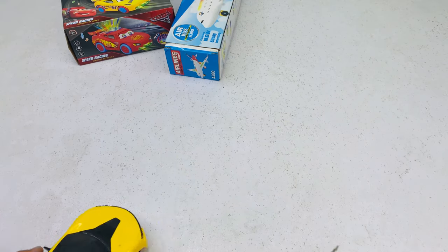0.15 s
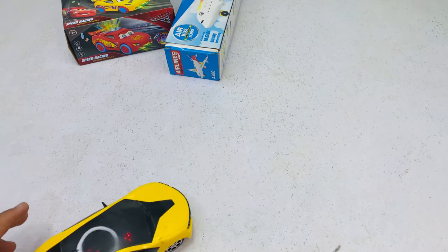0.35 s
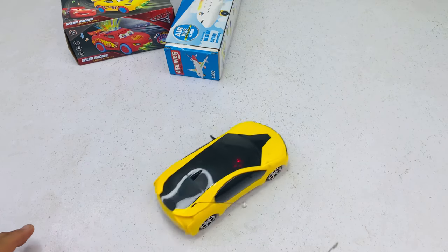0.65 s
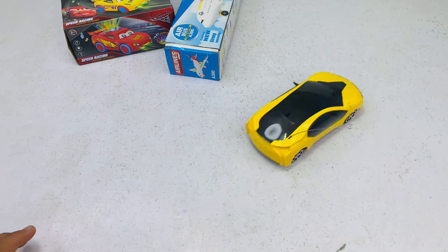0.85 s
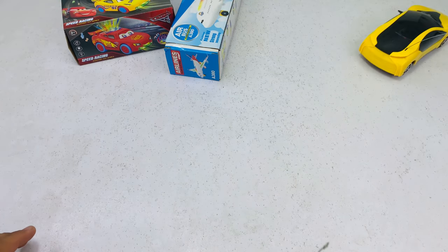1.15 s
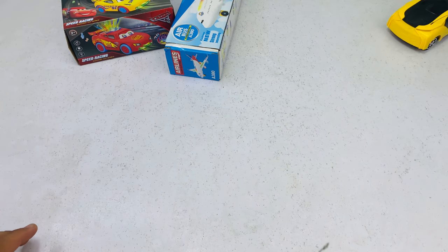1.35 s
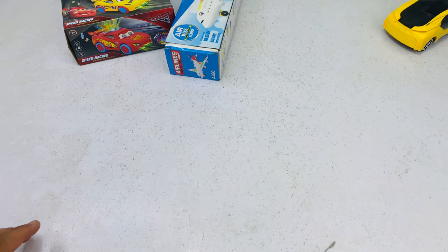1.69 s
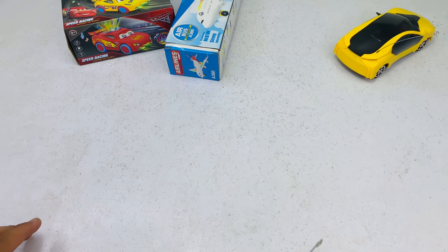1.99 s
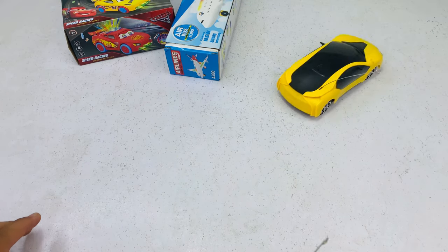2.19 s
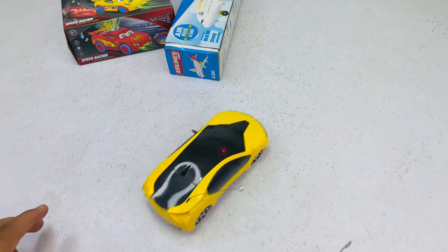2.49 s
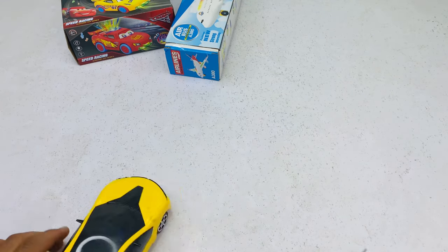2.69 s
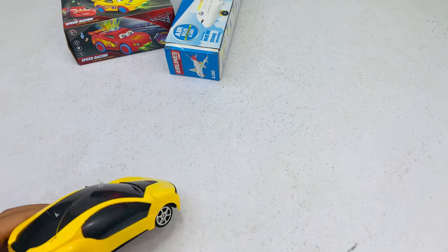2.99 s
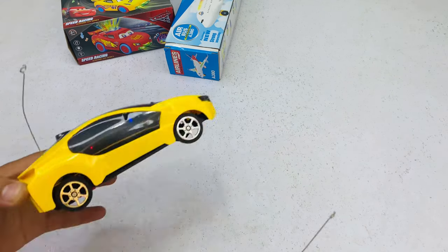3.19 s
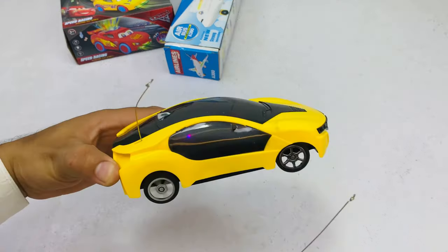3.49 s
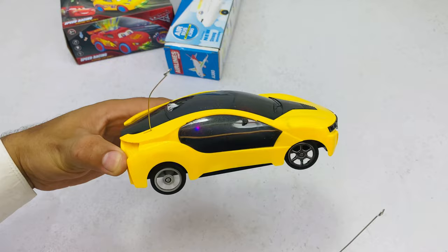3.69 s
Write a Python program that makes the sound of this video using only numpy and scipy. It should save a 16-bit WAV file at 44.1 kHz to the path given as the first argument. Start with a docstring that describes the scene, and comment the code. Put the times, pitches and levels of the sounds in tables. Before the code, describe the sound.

Plastic gear whir of a toy car drives off, stops, reverses back, then spins on when lifted.

```python
"""Toy car on a hard floor

A toy remote-control car drives off indoors, stops, reverses and is picked up with its wheels spinning.
Plastic gear teeth rattle its hollow shell, in a burst on every turn of an off-centre gear.
The small motor hums beneath, its brushes hiss, and it strains into reverse with a few ringing tones.
The rolling wheels rumble and make the floor boom; the chassis knocks now and then in a small room."""
import sys
import numpy as np
from scipy import signal
from scipy.fft import rfft, irfft, next_fast_len
from scipy.io import wavfile
from scipy.ndimage import map_coordinates

SR = 44100
rng = np.random.default_rng(int(sys.argv[2]) if len(sys.argv) > 2 else 0)


def generate_wav(sig):
    """Save sig (samples, or channels by samples) to the path in sys.argv[1] as 16-bit PCM at SR."""
    pcm = np.round(np.clip(np.atleast_2d(sig).T, -1, 1) * 32767).astype(np.int16)
    wavfile.write(sys.argv[1], SR, pcm)


N = 169785

# Source levels hold ahead of distance, room, stereo and microphone. Colours are relative, at rms 1.

# Drive gear speed. Each row: time in seconds, turns per second.
GEAR_SPEED = [(0, 43), (.3, 43.3), (1.1, 54), (1.35, 37.7), (1.55, 10.75), (1.85, 40.1), (2.5, 43.5),
              (2.9, 44), (3.17, 23.3), (3.3, 44)]
# Gear noise. Each row: time in seconds, shell clatter in dB, treble rasp in dB before RASP_TRIM_DB.
GEAR_LEVELS = [(0.0, -27, -45.5), (0.07, -44, -50.5), (0.11, -49, -64), (0.17, -42, -59.5),
               (0.26, -34, -46.5), (0.32, -42, -55), (0.87, -30.5, -41.5), (1.17, -32, -42),
               (1.41, -48, -58.5), (1.54, -72, -83), (1.75, -48, -56), (1.86, -50.5, -55.5),
               (1.91, -39, -47.5), (2.05, -44.5, -52.5), (2.07, -32, -40), (2.12, -35, -45.5),
               (2.55, -29.5, -41), (2.63, -34.5, -39.5), (2.65, -23.5, -32.5), (2.72, -36, -49),
               (2.81, -36, -47), (2.85, -27.5, -37), (3.06, -43, -51.5), (3.1, -48, -58.5),
               (3.17, -50, -67), (3.33, -39, -42.5), (3.54, -33, -36.5), (3.8, -33.5, -34)]
RASP_TRIM_DB = 3
TEETH_PER_TURN, MOTOR_TURNS_PER_TURN = 29, 3.87  # per turn of the drive gear
LIFT_MIDDLE_S, LIFT_TAKES_S = 3.06, 0.17  # the car leaves the floor
# Gear colours on the floor and in the hand. Each row: frequency in Hz, density in dB per Hz.
CLATTER_FLOOR = [(200, -53), (350, -8), (590, -3.5), (760, 0.5), (950, 0), (1250, -7.5), (1600, -12.5),
                 (2000, -24), (2800, -26.5), (5000, -100)]
CLATTER_HAND = [(200, -29), (480, -12.5), (900, -3.5), (1060, 2), (1350, 0), (1620, 1), (1850, -11),
                (2800, -16), (5000, -81)]
RASP_FLOOR = [(1000, -43.5), (1800, 4.5), (2300, 2.5), (3000, -1.5), (3700, 2.5), (4600, 1), (5500, -5.5),
              (7500, -5), (11000, -15), (15000, -23)]
RASP_HAND = [(900, -7), (1800, -3), (2600, 7), (3000, 4.5), (3500, 5.5), (4800, 5), (5600, 4), (7200, 5),
             (8200, 1), (10600, 0.5), (12300, -6), (15000, -19)]
CLATTER_BITE_DB, CLATTER_SHAKE_DB = 0.23, 2.36  # swing once a turn, random swing
RASP_BITE_DB, RASP_SHAKE_DB = 1.2, 1.7
BUZZ_DB, BUZZ_ORDERS = -12.5, 40  # against the teeth; harmonics of the motor turn
# Off-centre gear's knock. Each row: time in seconds, level in dB against the teeth.
SLAP_LEVEL = [(0, -5), (3.15, -11.5), (3.28, 2.5), (3.55, 0.5), (3.65, -9)]
SLAP_FLOOR_HZ, SLAP_HAND_HZ, SLAP_T60_S, SLAP_SCATTER_DB = 875, 1280, .012, 1.5
# Air inside the shell. Each row: frequency in Hz, width in Hz, peak gain in dB.
CAVITY_MODES = [(486, 56, -3), (622, 10, -4)]
# Drone of that air. Each row: time in seconds, level in dB.
DRONE_LEVEL = [(0, -32), (.12, -46), (.25, -45), (.4, -50.5), (1.17, -38.5), (1.5, -77), (1.9, -52.5),
               (2.65, -37.5), (3.2, -57.5), (3.27, -44), (3.78, -41.5)]
# Motor hum. Each row: multiple of the motor speed, mean amplitude in dB against the clatter.
MOTOR_HARMONICS = [(1, -17.5), (3, -20)]

# Brush hiss. Each row: time in seconds, level in dB.
BRUSH_LEVEL = [(0, -48), (.15, -85), (.45, -54), (.65, -48.5), (1.2, -53), (1.5, -88), (1.9, -52),
               (2.1, -55), (3.15, -58.5), (3.85, -36)]
# Brush hiss colour. Each row: frequency in Hz, density in dB per Hz.
BRUSH_COLOUR = [(2500, -24), (3200, -27), (3520, 14.5), (3800, 1), (4100, 7), (4600, 7.5), (5200, -16),
                (7000, -14)]
# Strain into reverse. Each row: time in seconds, level in dB.
RESTART_LEVEL = [(1.55, -81), (1.72, -49.5), (1.95, -50.5), (2.2, -60)]
# Resonances of that strain. Each row: frequency in Hz, width in Hz, peak gain in dB.
STRAIN_MODES = [(895, 15, 7.5), (1005.2, 71, 0.5), (1623, 65, -1)]
HISS_HZ, HISS_HALF_WIDTH_HZ, HISS_DB = 4210, 620, -6  # dB against the strain's resonances

# Chassis knocks. Each row: start in seconds, then click, thud and ring in dB before their trims.
KNOCKS = [(.533, -34, -40, -42), (0.9443, -24, -31, -31.5), (2.186, -48, -39, -36),
          (2.308, -34, -32, -28.5), (2.6467, -23.5, -29, -24), (2.655, -37, -32, -39),
          (2.68, -43, -18, -32), (2.913, -30, -41, -27), (2.963, -27, -37, -53),
          (3.1115, -26.5, -30.5, -30.5), (3.26, -28, -30.5, -57), (3.383, -18, -42, -48),
          (3.4492, -22, -34, -45)]
CLICK_T60_S, THUD_T60_S, RING_T60_S = 0.028, 0.022, 0.14
CLICK_TRIM_DB, THUD_TRIM_DB, RING_TRIM_DB = -8.5, -1.5, -4.5
# Ring of the shell. Each row: frequency in Hz, density in dB per Hz.
RING_COLOUR = [(400, -9), (1300, 3), (1600, 2), (2400, 4), (3300, 1), (4200, -3), (8000, -13), (15000, -59)]

# Wheel rumble. Each row: time in seconds, level in dB before ROLL_TRIM_DB.
ROLL_LEVEL = [(0.0, -31), (0.06, -52.5), (0.37, -48), (0.73, -36), (0.9, -36), (1.15, -30), (1.46, -40),
              (1.54, -57), (1.68, -40.5), (1.96, -30.5), (2.0, -31.5), (2.51, -33.5), (2.73, -34.5),
              (2.85, -50), (3.19, -45), (3.39, -62.5), (3.71, -44)]
ROLL_TRIM_DB, ROLL_SIDE_DB = -3, -11.5
# Low chassis resonances. Each row: frequency in Hz, width in Hz, peak gain in dB.
CHASSIS_MODES = [(154.7, 7.1, -1.5), (200.8, 16.3, 0.5), (239.8, 8, 1.5), (271.7, 8.2, -1.5), (310, 7.5, 2),
                 (385.4, 38.5, -9)]
# Floor boom. Each row: time in seconds, level in dB.
BOOM_LEVEL = [(0.0, -26), (0.035, -63), (0.06, -36), (0.2, -36.5), (0.26, -53), (0.31, -31), (0.39, -32.5),
              (0.43, -37.5), (0.54, -30), (0.63, -48), (0.68, -32.5), (0.73, -43.5), (0.91, -31),
              (0.98, -40), (1.06, -26.5), (1.14, -38.5), (1.39, -42.5), (1.45, -39), (1.58, -55),
              (1.78, -42), (2.19, -39.5), (2.22, -28), (2.49, -27.5), (2.56, -47), (2.6, -30), (2.645, -45),
              (2.68, -24), (2.76, -34.5), (3.1, -56), (3.45, -65)]
# Dull thumps of the floor. Each row: frequency in Hz, density in dB per Hz.
THUMP_COLOUR = [(20, -41), (30, -26), (39, -7), (52, 1.5), (90, 1.5), (120, -7), (200, -44), (500, -70)]
FLOOR_HZ, FLOOR_WANDER_HZ, THUMP_DB = 68.5, 3.67, -7  # dB against the floor's ring

# Distance. Each row: time in seconds, distance from 0 near to 1 far.
DISTANCE = [(0, 0.89), (.3, 0.44), (.8, 1), (2.5, 1), (2.85, 0.027)]
# Treble lost at the far end. Each row: frequency in Hz, gain in dB.
DULLING = [(3000, 0.5), (5500, -5.5), (8000, -7), (11000, -4.5), (15000, -18)]
# Room decay. Each row: frequency in Hz, T60 in seconds.
ROOM_T60 = [(100, 0.21), (1000, 0.15), (5000, 0.087), (14000, 0.081)]
DIRECT_DB, TAIL_DB, WALLS_DB = -1.9, -7.5, -5.5
WALLS_T60_S, WALLS_MID_DB, PATH_CHANGE_S = 0.015, -7, .08  # mid: part common to both ears
# Stereo width. Each row: frequency in Hz, side gain in dB.
SIDE_GAIN = [(150, -26), (500, 2), (2000, 3), (5000, 1), (8000, 3), (12000, 4)]
# Position, slightly left. Each row: time in seconds, left minus right in dB.
PAN = [(0.62, 1.5), (0.87, 0.7), (2.39, 1), (2.6, 2.1)]
# Room noise. Each row: frequency in Hz, density in dB per Hz.
AIR_COLOUR = [(25, -11), (70, 1), (160, -0.5), (280, -5), (500, -11), (2000, -22.5), (8000, -38.5),
              (15000, -37)]
AIR_DB = -53
# Microphone response. Each row: frequency in Hz, gain in dB.
MICROPHONE = [(20, 0), (8100, -1.5), (8450, -9), (8700, -12), (9100, -33), (9400, -14), (9800, -1.5),
              (12200, 3), (12800, -23), (13400, -20), (14100, 2.5), (15100, -5.5), (15800, -24)]
TOP_HZ = 16000


def amp(db):
    """Decibels to gain."""
    return 10 ** (np.asarray(db) / 20)


def unit(x):
    """Scaled to rms 1."""
    return x / np.sqrt(np.mean(x ** 2) + 1e-20)


def along(points, hz):
    """(Hz, value) points read on a log axis."""
    f, v = np.transpose(points)
    return np.interp(np.log(hz + 1), np.log(f + 1), v)


def curves(rows):
    """One value per sample for each column after the time."""
    s, *cols = np.transpose(rows)
    return [np.interp(np.arange(N) / SR, s, c) for c in cols]


def wobble(rate_hz):
    """A smooth random curve, rate_hz knots a second."""
    knots = rng.standard_normal(N // 8)
    return map_coordinates(knots, [np.arange(N) * rate_hz / SR], mode="mirror")


def filtered(x, response):
    """x times a complex response of frequency."""
    m = 2 * next_fast_len(N // 2 + SR // 4)
    return irfft(rfft(x, m) * response(np.fft.rfftfreq(m, 1 / SR)), m)[..., :N]


def coloured(x, points):
    """x through a minimum-phase filter with the given (Hz, dB) shape."""
    def response(hz):
        cepstrum = irfft(np.log(amp(along(points, hz))))
        half = len(cepstrum) // 2
        cepstrum[1:half] *= 2
        cepstrum[half + 1:] = 0
        return np.exp(rfft(cepstrum))
    return filtered(x, response)


def resonant(x, modes):
    """x through (Hz, width Hz, dB) resonances of alternating sign, at rms 1."""
    def response(f):
        total = 0
        for k, (centre, width, db) in enumerate(modes):
            damping = 1j * f * width
            total = total + (-1) ** k * amp(db) * damping / (centre ** 2 - f ** 2 + damping)
        return total
    return unit(filtered(x, response))


def turns():
    """Angle of the drive gear in turns; its speed is a little unsteady."""
    speed = curves(GEAR_SPEED)[0]
    return np.cumsum(speed * (1 + .008 * wobble(25))) / SR


def gears(angle):
    """The teeth bite harder and slap once a turn: shell clatter, treble rasp, air drone, motor hum."""
    clatter_db, rasp_db = curves(GEAR_LEVELS)
    bite = np.cos(2 * np.pi * (angle + .12 * wobble(35)))
    shake = wobble(380)
    ticks = teeth(angle, scatter_db=3, slop=.25, scrape=.2)
    clatter = (ticks + buzz(angle)) * amp(CLATTER_BITE_DB * bite + CLATTER_SHAKE_DB * shake)
    clatter = shell(clatter, CLATTER_FLOOR, CLATTER_HAND)
    clatter = clatter + amp(curves(SLAP_LEVEL)[0]) * slaps(angle)
    rasp = teeth(angle, scatter_db=6, slop=.22, scrape=1) + buzz(angle)
    rasp = shell(rasp * amp(RASP_BITE_DB * bite + RASP_SHAKE_DB * shake), RASP_FLOOR, RASP_HAND)
    drone = amp(curves(DRONE_LEVEL)[0]) * resonant(ticks, CAVITY_MODES)
    return amp(clatter_db) * (clatter + motor_hum(angle)) + amp(rasp_db + RASP_TRIM_DB) * rasp + drone


def teeth(angle, scatter_db, slop, scrape):
    """One tick per tooth contact, uneven in size and timing, over sliding noise."""
    count = np.arange(1, int(angle[-1] * TEETH_PER_TURN))
    late, size = rng.standard_normal((2, len(count)))
    at = np.interp((count + slop * late) / TEETH_PER_TURN, angle, np.arange(N)).astype(int)
    ticks = np.bincount(at, amp(scatter_db * np.clip(size, -2, 2)), N)
    return unit(ticks) + scrape * rng.standard_normal(N)


def buzz(angle):
    """The pinion's worn teeth give the same rough pattern on every motor turn."""
    real, imaginary = rng.standard_normal((2, BUZZ_ORDERS))
    pattern = irfft(real + 1j * imaginary, 1024)
    phase = np.arange(len(pattern)) / len(pattern)
    wave = np.interp(MOTOR_TURNS_PER_TURN * angle, phase, pattern - pattern.mean(), period=1)
    return amp(BUZZ_DB) * unit(wave)


def slaps(angle):
    """One short, pitched knock of the shell per turn, uneven in size, pitch and timing."""
    count = np.arange(1, int(angle[-1]) + 1)
    late, detune, size = np.clip(rng.standard_normal((3, len(count))), -1.5, 1.5)
    at = np.interp(count + .1 * late, angle, np.arange(N)).astype(int)
    hz = np.where(at / SR < LIFT_MIDDLE_S, SLAP_FLOOR_HZ, SLAP_HAND_HZ) * (1 + .08 * detune)
    step = np.arange(SR // 50)
    t = step / SR
    envelope = amp(SLAP_SCATTER_DB * size[:, None] - 60 * t / SLAP_T60_S) * np.sqrt(t)
    rings = envelope * np.sin(2 * np.pi * hz[:, None] * t)
    return unit(np.bincount((at[:, None] + step).ravel(), rings.ravel(), N)[:N])


def shell(x, on_floor, in_hand):
    """The shell's colour changes as the car is lifted and its underside opens to the air."""
    lifted = np.clip((np.arange(N) / SR - LIFT_MIDDLE_S) / LIFT_TAKES_S + .5, 0, 1)
    floor, hand = unit(coloured(x, on_floor)), unit(coloured(x, in_hand))
    return np.sqrt(1 - lifted) * floor + np.sqrt(lifted) * hand


def motor_hum(angle):
    """Harmonics locked to the motor's turns, each wavering in level."""
    phase = 2 * np.pi * MOTOR_TURNS_PER_TURN * angle
    return sum(amp(db + 1.8 * wobble(14)) * np.sin(k * phase) for k, db in MOTOR_HARMONICS)


def brushes(angle):
    """The brushes scrape round the commutator and ring the motor's can."""
    swing_db = 5.3 * np.cos(2 * np.pi * MOTOR_TURNS_PER_TURN * angle)
    scrape = rng.standard_normal(N) * amp(swing_db)
    return amp(curves(BRUSH_LEVEL)[0]) * unit(coloured(scrape, BRUSH_COLOUR))


def restart(angle):
    """Straining into reverse, the motor rings a few resonances under a narrow, bright hiss."""
    scrape = rng.standard_normal(N) * (1 + .5 * np.cos(2 * np.pi * MOTOR_TURNS_PER_TURN * angle))
    hiss = unit(filtered(scrape, lambda hz: 1 / (1 + ((hz - HISS_HZ) / HISS_HALF_WIDTH_HZ) ** 6)))
    return amp(curves(RESTART_LEVEL)[0]) * (resonant(scrape, STRAIN_MODES) + amp(HISS_DB) * hiss)


def knocks():
    """Loose plastic parts strike: a short click, a duller thud and a ring of the shell."""
    t = np.arange(N) / SR

    def strikes(column, t60_s):
        return sum((t >= row[0]) * amp(row[column] - 60 * np.abs(t - row[0]) / t60_s) for row in KNOCKS)
    noise = rng.standard_normal((3, N))
    click = strikes(1, CLICK_T60_S) * unit(coloured(noise[0], RASP_HAND))
    thud = strikes(2, THUD_T60_S) * shell(noise[1], CLATTER_FLOOR, CLATTER_HAND)
    ring = strikes(3, RING_T60_S) * unit(coloured(noise[2], RING_COLOUR))
    return amp(CLICK_TRIM_DB) * click + amp(THUD_TRIM_DB) * thud + amp(RING_TRIM_DB) * ring


def wheels():
    """The grain of the floor shakes the chassis's low resonances."""
    grain = filtered(rng.standard_normal((2, N)), lambda hz: 1 / (1 + (hz / 600) ** 4))
    mid, side = resonant(grain, CHASSIS_MODES)
    return amp(curves(ROLL_LEVEL)[0] + ROLL_TRIM_DB) * (mid + amp(ROLL_SIDE_DB) * np.array([side, -side]))


def floor_boom():
    """The floor rings at one low, wavering pitch under the wheels, with dull thumps round it."""
    hz = FLOOR_HZ + FLOOR_WANDER_HZ * wobble(18)
    ring = unit(np.sin(2 * np.pi * np.cumsum(hz) / SR))
    thumps = unit(coloured(rng.standard_normal(N), THUMP_COLOUR))
    return amp(curves(BOOM_LEVEL)[0]) * (ring + amp(THUMP_DB) * thumps)


def distant(x):
    """The farther the car, the duller it sounds."""
    far = curves(DISTANCE)[0]
    return (1 - far) * x + far * filtered(x, lambda hz: amp(along(DULLING, hz)))


def room(x):
    """Direct sound, quick reflections from floor and boxes, and a short tail, on ever-changing paths."""
    hop, length = int(PATH_CHANGE_S * SR), SR // 3
    x = np.pad(x, (hop, 2 * hop))
    out = np.zeros((2, N + 4 * hop + length))
    fade = np.sin(np.pi * np.arange(2 * hop) / (2 * hop))
    t = np.arange(length) / SR
    for start in range(0, N + hop, hop):  # a fresh response for each overlapping block
        hz, age, z = signal.stft(rng.standard_normal((2, length)), SR, nperseg=256)
        decay = amp(-60 * age / along(ROOM_T60, hz)[:, None])
        tail = signal.istft(z * decay, SR, nperseg=256)[1][:, :length]
        common, apart = rng.standard_normal((2, length)) * amp(-60 * t / WALLS_T60_S)
        walls = amp(WALLS_MID_DB) * common + np.array([apart, -apart])
        answer = amp(TAIL_DB) * tail / np.linalg.norm(tail[0])
        answer = answer + amp(WALLS_DB) * walls / np.linalg.norm(walls[0])
        wet = signal.fftconvolve((x[start:start + 2 * hop] * fade)[None], answer, axes=1)
        out[:, start:start + wet.shape[1]] += wet
    return amp(DIRECT_DB) * x[hop:hop + N] + out[:, hop:hop + N]


def spread(x):
    """The two microphone ports hear the treble less alike than the bass."""
    mid = x.mean(0)
    side = filtered((x[0] - x[1]) / 2, lambda hz: amp(along(SIDE_GAIN, hz)))
    return np.array([mid + side, mid - side])


def air():
    """Quiet room noise, independent in each channel."""
    return amp(AIR_DB) * unit(coloured(rng.standard_normal((2, N)), AIR_COLOUR))


def scene():
    """The car moves away and comes back close, always slightly left of centre, over the quiet room."""
    pan_db = curves(PAN)[0]
    angle = turns()
    drive = distant(gears(angle) + brushes(angle) + restart(angle))
    car = spread(room(drive + knocks())) * amp(np.array([pan_db, -pan_db]) / 2)
    return car + wheels() + floor_boom() + air()


def record(dry):
    """The microphone has two notches in the treble and a band limit."""
    return filtered(dry, lambda hz: amp(along(MICROPHONE, hz)) * (hz < TOP_HZ))


dry = scene()
out = record(dry)
generate_wav(out)
```